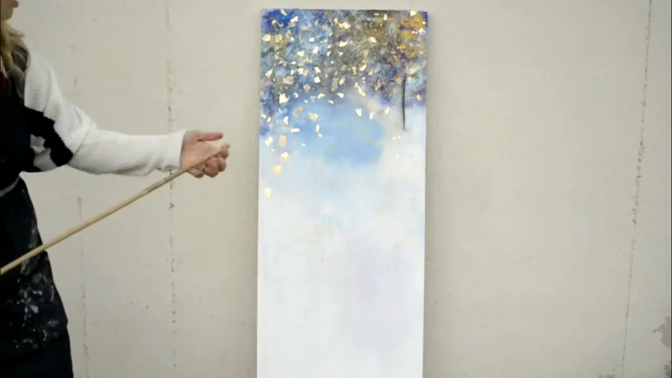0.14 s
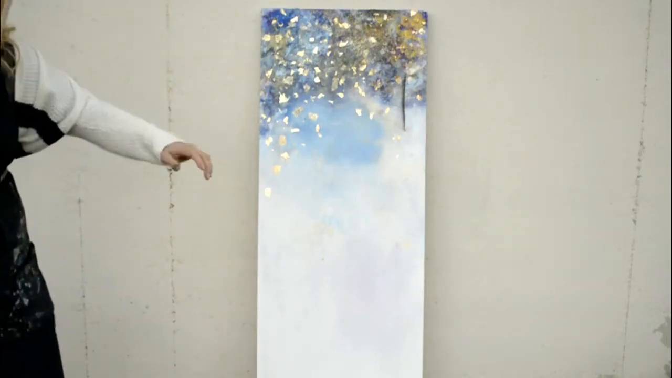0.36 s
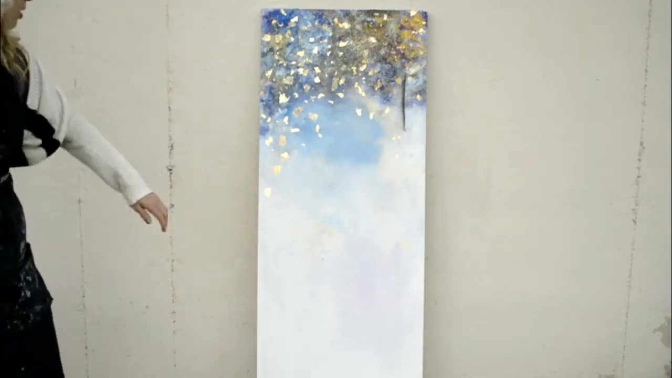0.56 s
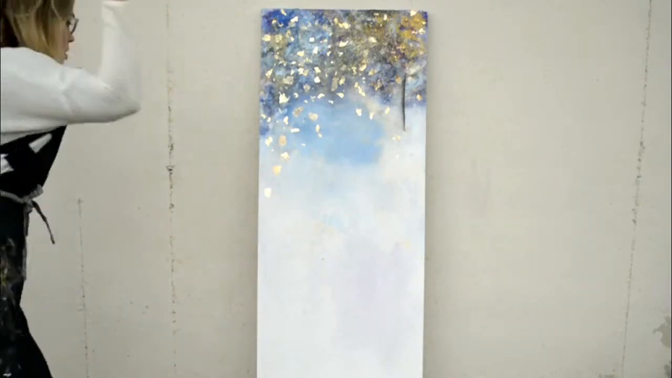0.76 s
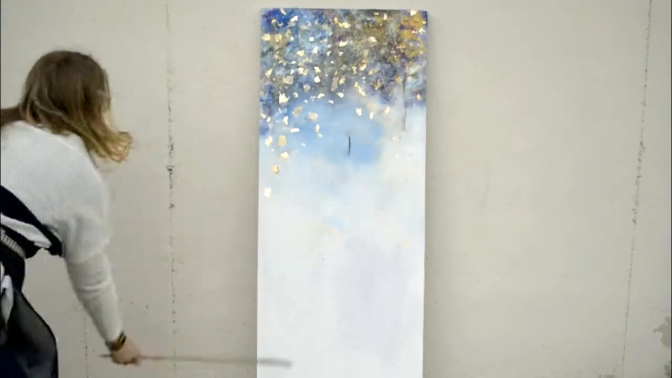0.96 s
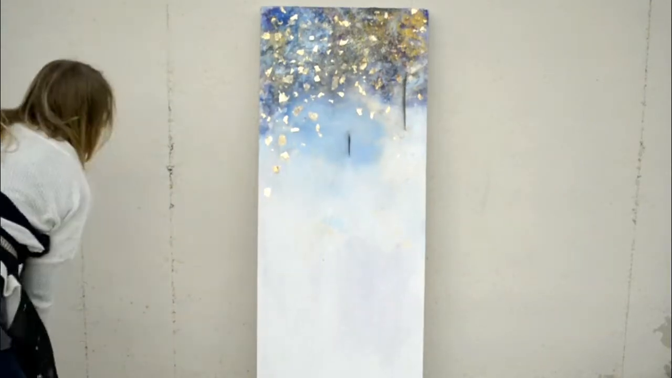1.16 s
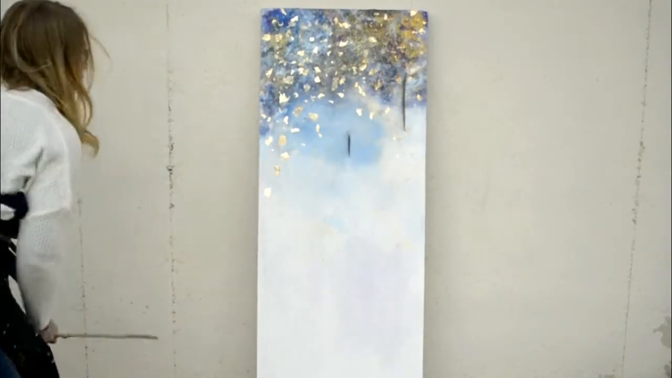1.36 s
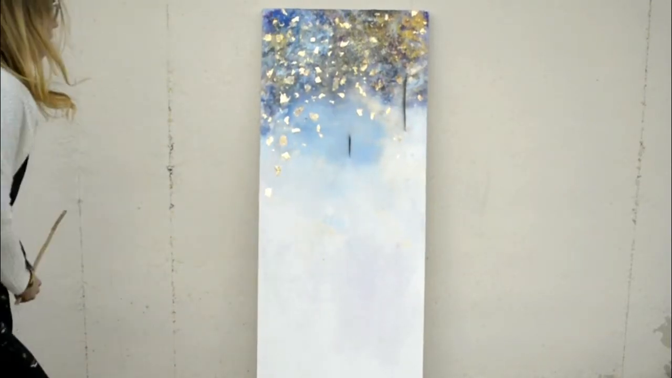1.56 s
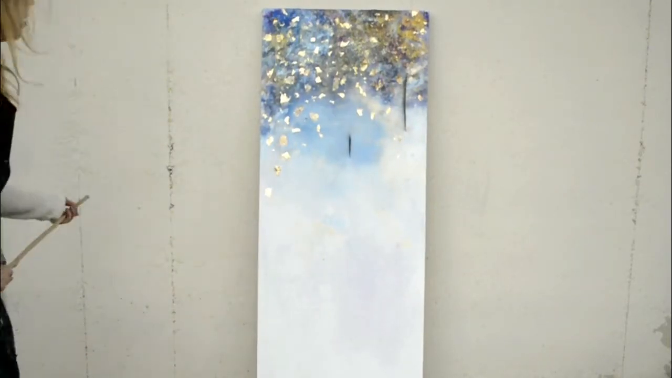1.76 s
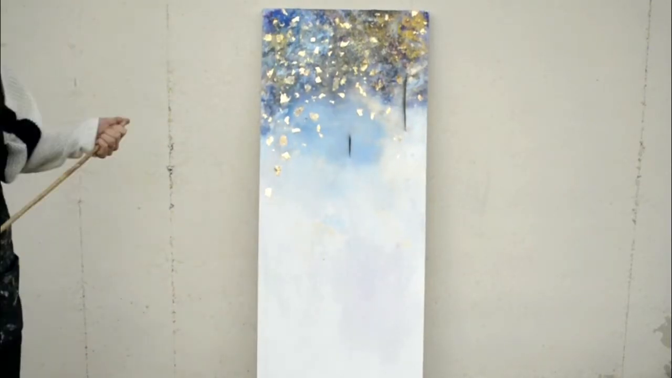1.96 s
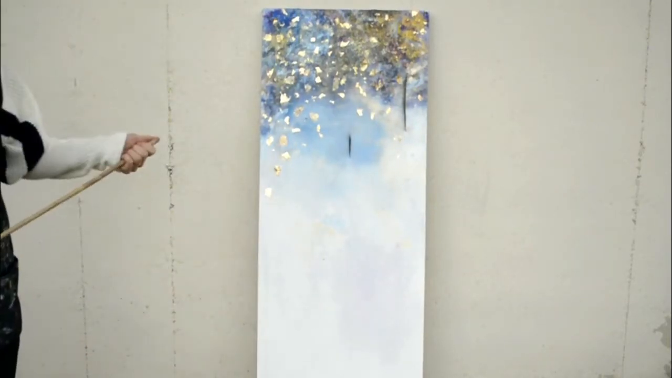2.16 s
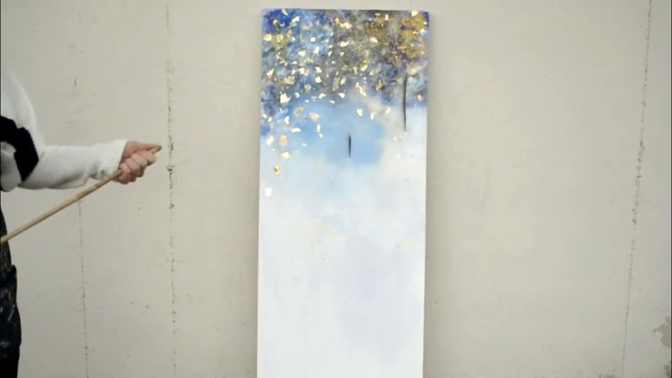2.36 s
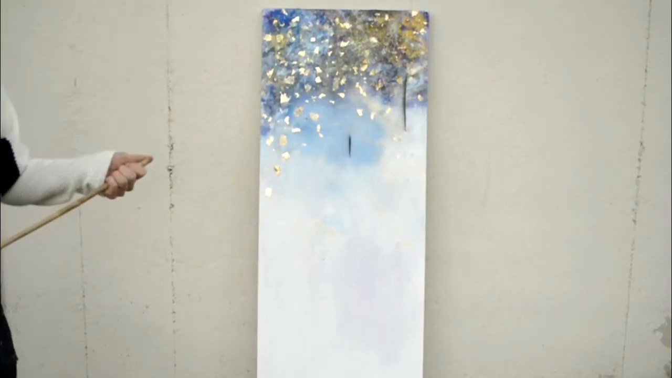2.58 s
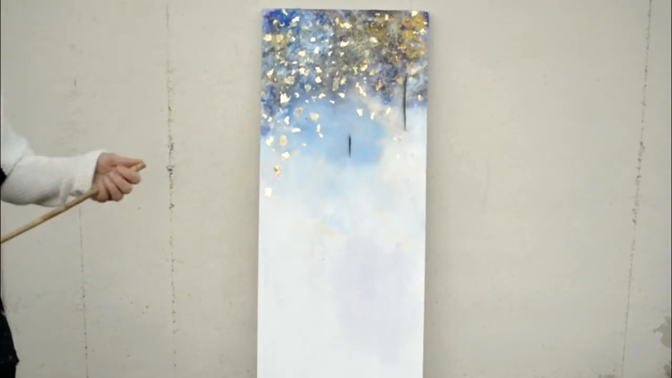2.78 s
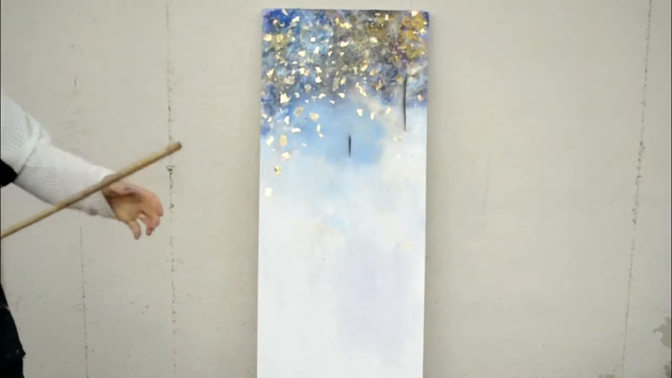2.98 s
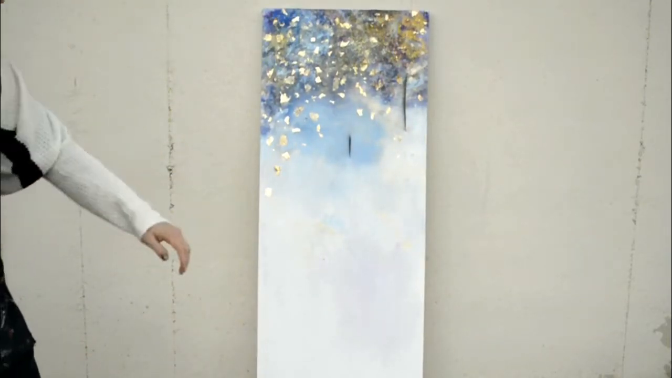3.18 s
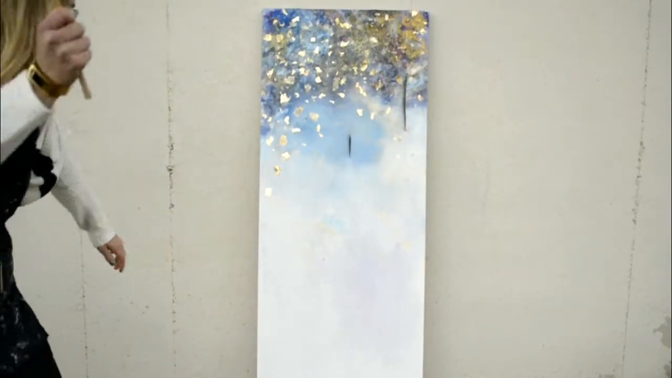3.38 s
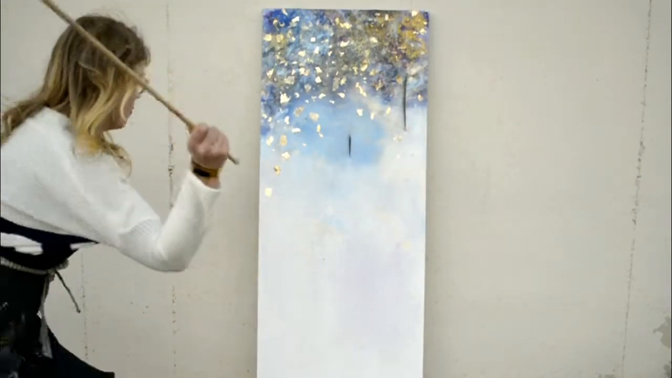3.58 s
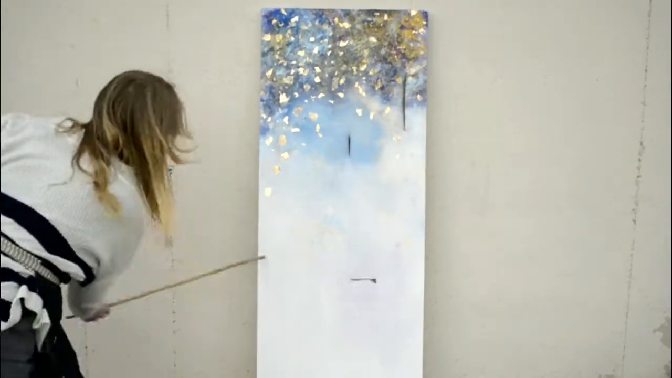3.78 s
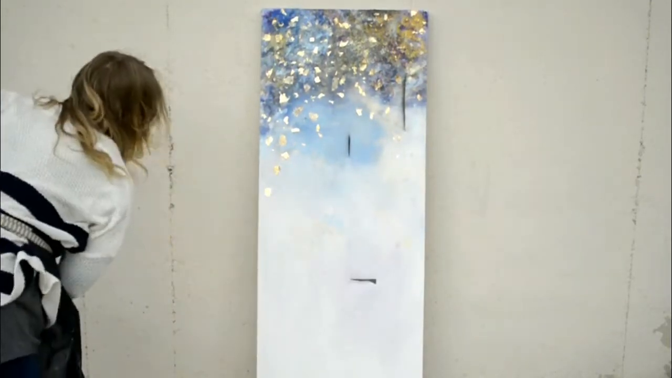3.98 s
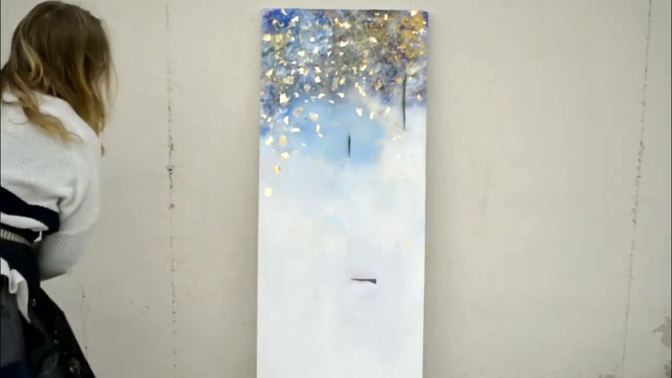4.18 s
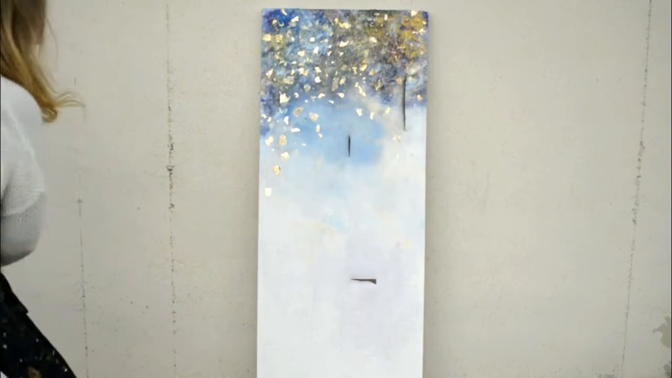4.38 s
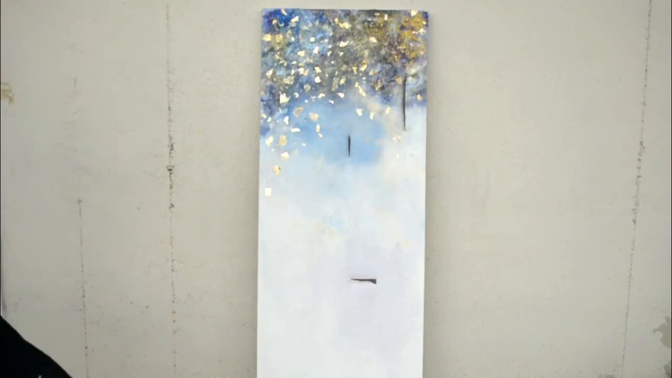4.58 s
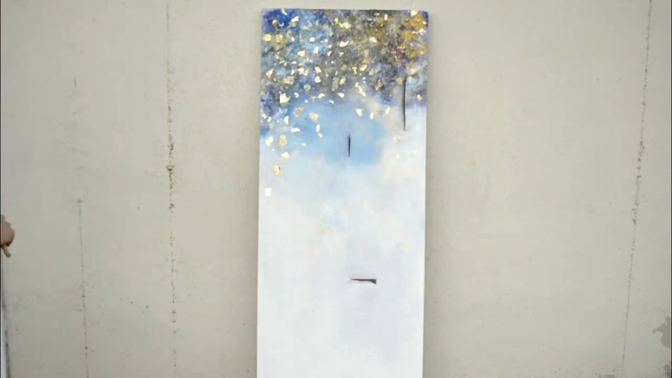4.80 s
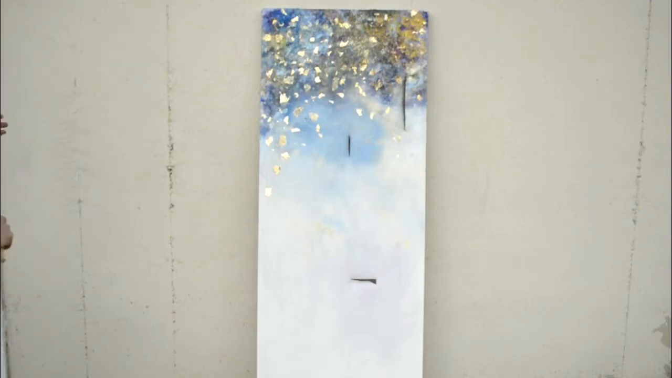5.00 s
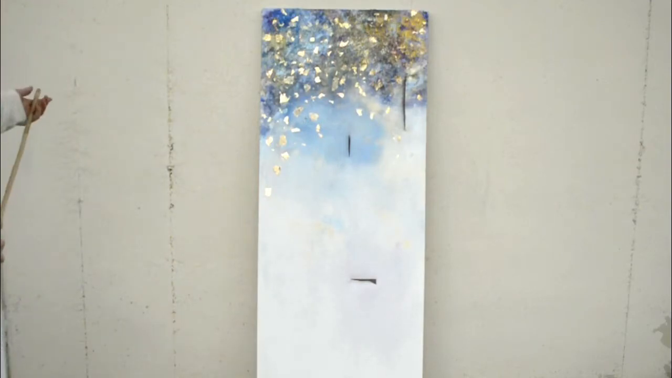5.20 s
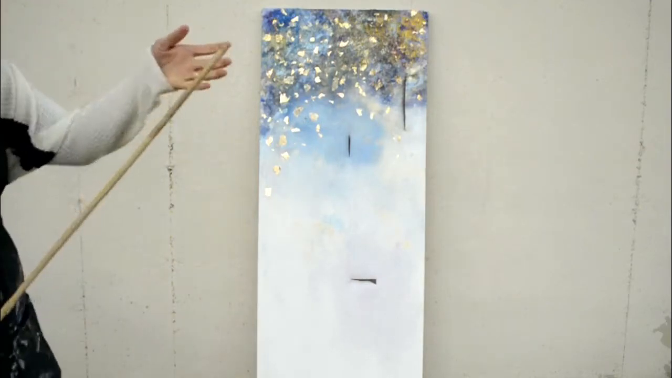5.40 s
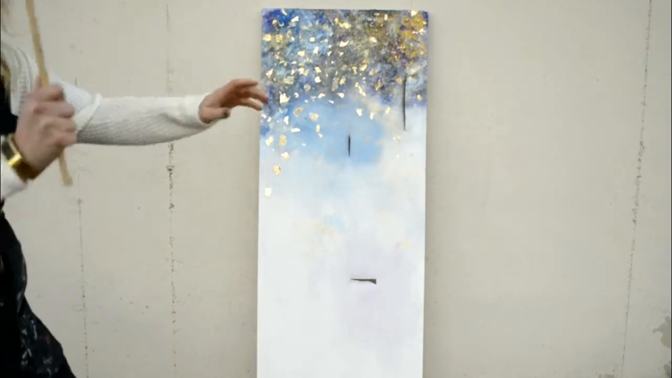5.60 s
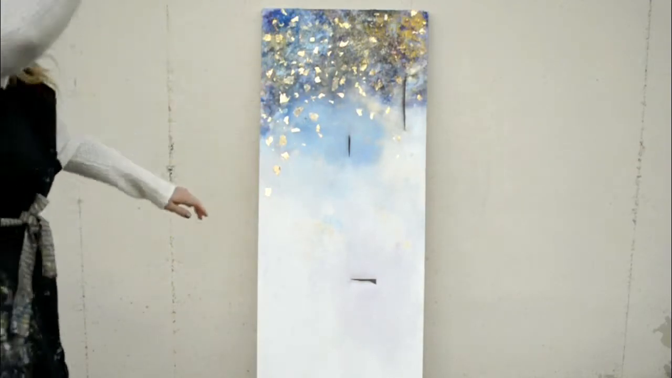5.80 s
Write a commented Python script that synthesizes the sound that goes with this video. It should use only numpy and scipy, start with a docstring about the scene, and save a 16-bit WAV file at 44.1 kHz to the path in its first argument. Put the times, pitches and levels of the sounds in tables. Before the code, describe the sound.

A low motor drone near 93 Hz, wavering slightly, and soft ventilation run throughout, with very faint sleeve rustle. Cloth rubs at 0.75 s; a short rising swish leads into a huge, sharp wooden crack at 0.92 s, with a shrill falling hiss, a booming board ring of a fraction of a second, wall echoes and room tail. Bright clacks cluster at 1.02-1.04 s and return from a far wall. A thin, very quiet tone around 1265 Hz swells, holds until about 1.8 s, then slowly dies. A soft bump falls at 1.41 s, a faint shoe shuffle at 1.9 s, and finger ticks and rubs around 2.0 s, sparser afterward. A second swish and slightly louder crack at 3.73 s rings lower, with a knocking clack at 3.80 s. Light ticks and rubs follow at 4.2-4.6 s, firm woody ticks and a scrape at 4.9 s, a tiny wavering squeak at 5.25 s, and a soft scuff at 5.7 s.

```python
"""Close in front of a painted panel in a studio, over a steady motor hum and soft ventilation.
Sleeves rustle, a long wooden stick swishes in and cracks on the board: shrill hisses, a boom, echoes.
Clacks follow; a thin tone swells, holds and slowly dies, with a soft bump, finger ticks and rubs during it.
The second swish and crack ring the board lower down; fewer clacks, firmer ticks and scrapes follow.
Near the end the hand squeaks faintly and shoes scuff the floor. Decaying modes, noise and tones build it."""
import sys
import numpy as np
from scipy import signal
from scipy.fft import rfft, irfft, next_fast_len
from scipy.io import wavfile
from scipy.ndimage import map_coordinates

SR = 44100
rng = np.random.default_rng(int(sys.argv[2]) if len(sys.argv) > 2 else 0)


def to_wav(sig):
    """Store sig (one row per channel, or 1-D mono) as 16-bit WAV at the path in sys.argv[1].

    Samples outside -1..1 are clipped; the rate is SR.
    """
    pcm = np.clip(np.atleast_2d(sig), -1, 1) * 32767
    pcm = np.round(pcm).astype(np.int16)
    wavfile.write(sys.argv[1], SR, pcm.T)  # frames by channels


N = 257984
TIME = np.arange(N) / SR
AGE = TIME[:SR]  # one second, counted from the start of a short sound

# blows on the panel: t/s, crack/dB, board noise/dB, board modes/dB, swish/dB, room/dB,
# snap/dB relative to the crack
BLOWS = [(0.9171, -4, -17.5, -22.5, -43.5, -35, -14), (3.7328, -0.5, -17, -22.5, -44, -35, -10)]
FIRST_BLOW_S = BLOWS[0][0]
# colour of bright wooden contact: f/Hz, relative level/dB
CLACK_COLOUR = [(300, -28), (1200, -12.5), (2400, -2), (3700, 1), (5500, -1.5), (7500, 2.5), (10000, -11),
                (15500, -37)]
# colour of what the far walls return: f/Hz, level/dB
FAR_WALL_COLOUR = [(300, -32), (1200, -19), (2400, -15), (4200, -24), (6500, -32.5), (12000, -48)]
# colour of brushing cloth: f/Hz, relative level/dB
CLOTH_COLOUR = [(300, -20), (2200, -10), (3100, -1.5), (4400, -5), (8500, -0.5), (12000, -10.5),
                (15500, -16.5)]
# colour of dry wood scraping: f/Hz, relative level/dB
SCRAPE_COLOUR = [(300, -16), (640, 8), (800, 4.5), (3300, 3), (5000, -9), (8200, 2), (12000, -14.5),
                 (16000, -20)]


def amp(db):
    """Gain of a level in dB."""
    return 10 ** (np.asarray(db) / 20)


def unit(x):
    """x at rms 1."""
    return x / np.sqrt(np.mean(x ** 2) + 1e-20)


def along(points, hz):
    """Read (f/Hz, value) points on a log frequency axis."""
    f, v = np.transpose(points)
    return np.interp(np.log(hz + 1), np.log(f), v)


def curves(rows):
    """One value per sample for each column after the time."""
    s, *columns = np.transpose(rows)
    return [np.interp(TIME, s, column) for column in columns]


def wobble(rate):
    """A smooth random curve with this many knots a second."""
    knots = rng.standard_normal(int(N * rate / SR) + 4)
    return map_coordinates(knots, [TIME * rate])


def filtered(x, response):
    """x with its spectrum multiplied by a response of frequency."""
    m = next_fast_len(len(x) + 8192)  # zero padding
    spectrum = rfft(x, m) * response(np.fft.rfftfreq(m, 1 / SR))
    return irfft(spectrum, m)[:len(x)]


def noise(colour, size=N):
    """Coloured noise of rms 1."""
    return unit(filtered(rng.standard_normal(size), lambda hz: amp(along(colour, hz))))


def fade(t, t60):
    """Free decay, 60 dB in t60 seconds."""
    return np.exp(-np.log(1000) * t / t60)


def dying(colour, decay):
    """A second of coloured noise in which each frequency dies at its own speed."""
    hz, t, bins = signal.stft(noise(colour, size=SR), SR, nperseg=256)
    t60 = along(decay, hz)[:, None]
    return signal.istft(bins * fade(t, t60), SR)[1][:SR]


def phase(hz):
    """Running phase of a moving frequency."""
    return 2 * np.pi * np.cumsum(hz) / SR


def whistle(hz, knot_rate):
    """Narrow noise of rms 1 around a moving frequency; more knots a second widen it."""
    turn = phase(hz)
    return unit(wobble(knot_rate) * np.sin(turn) + wobble(knot_rate) * np.cos(turn))


def add(track, s, sound):
    """Mix a sound into the track from time s."""
    part = track[round(s * SR):][:len(sound)]
    part += sound[:len(part)]


def reverberation(colour, build_s=0.021):
    """The studio's answer to one short sound: it swells as the walls are reached, then dies away."""
    # room decay: f/Hz, t60/s
    room_decay = [(150, 0.76), (1500, .62), (4000, 0.47), (8000, 0.38), (14000, 0.16)]
    return dying(colour, room_decay) * (1 - np.exp(-AGE / build_s))


def stroke(s, length):
    """Envelope that rises from nothing and sinks back over one length, as in a sliding movement."""
    progress = np.clip((TIME - s) / length, 0, 1)
    return np.sqrt(np.abs(np.sin(np.pi * progress)))


def blend(cloth, wood, share):
    """Mix of cloth and wood with this share of the power in the wood."""
    share = np.clip(share, 0, 1)
    return np.sqrt(1 - share) * cloth + np.sqrt(share) * wood


def crack(snap_db, contact_s=.0003, recoil_s=0.00028, snap_t60=.008,
          buzz_db=-27, buzz_t60=0.062, grain_db=4, grain_rate=900):
    """The stick slaps flat: a push of air, equal suction as the board springs back, a snap and a buzz."""
    # splintery snap of the stick: f/Hz, relative level/dB
    snap_colour = [(1200, -11), (3200, -0.5), (5800, -5), (8800, 3), (11000, -12), (15500, -22)]
    push = np.clip(1 - (2 * AGE / contact_s - 1) ** 4, 0, None)
    suction = (AGE > contact_s) * np.exp(-AGE / recoil_s)
    balanced_suction = suction * push.sum() / suction.sum()
    crackle = unit(amp(grain_db * wobble(grain_rate)))[:SR]
    snap_shape = amp(snap_db) * fade(AGE, snap_t60)
    buzz_shape = amp(buzz_db) * crackle * fade(AGE, buzz_t60)
    return push - balanced_suction + noise(snap_colour, size=SR) * (snap_shape + buzz_shape)


def blows(spread_s=0.0012, echo_t60=0.038):
    """Each blow cracks and rings the main modes; dense bending waves spread and the room answers."""
    # main modes, struck high up and lower down: f/Hz, level/dB, t60/s
    upper_modes = [(305, -1.5, 0.19), (385, 15.5, 0.025), (433, 0, .17), (668, -6, .12), (756, -4, 0.13),
                   (930, -8, 0.14), (1013, -6, 0.14), (1179, -9, .11), (1308, -8, .12), (1720, -7, 0.11)]
    lower_modes = [(155, -5, 0.049), (187, 8, 0.085), (230, 5, .11), (434.5, -4, 0.1), (538, 6.5, 0.052),
                   (681, -2.5, 0.1), (872, -5, 0.12), (1130, 2, .085), (1225, 3.5, 0.025),
                   (1750, -4.5, 0.093), (2150, -4, .05), (2355, -6.5, 0.09)]
    # dense rest of the ringing at the two places: f/Hz, relative level/dB
    upper_board = [(40, -18), (90, -13), (170, -5.5), (330, -0.5), (500, -2.5), (1050, -5), (1800, -8),
                   (2700, -12), (4300, -15.5), (6000, -21), (9000, -23.5), (15500, -38)]
    lower_board = [(50, -35), (110, -15), (200, -1), (330, -2), (560, -2.5), (800, -5), (1150, -2),
                   (2200, -8.5), (3200, -14.5), (5500, -18.5), (8500, -21.5), (15500, -44.5)]
    # decay of that ringing: f/Hz, t60/s
    board_decay = [(150, 0.15), (600, 0.14), (2000, 0.12), (9000, 0.086)]
    # colour of the room's answer: f/Hz, relative level/dB
    room_colour = [(60, -6.5), (200, 3), (600, -4), (1800, 2), (3500, -8.5), (8000, -12.5), (15000, -30.5)]
    # far walls throw the crack back: delay/s, level/dB relative to the crack setting
    echoes = [(.048, -37), (.092, -42.5), (.118, -43.5), (.153, -46.5)]
    out = np.zeros(N)
    places = ((upper_modes, upper_board), (lower_modes, lower_board))
    for blow, (modes, board_colour) in zip(BLOWS, places):
        s, crack_db, board_db, modes_db, _, room_db, snap_db = blow
        ring = sum(amp(db) * np.cos(2 * np.pi * hz * AGE) * fade(AGE, t60) for hz, db, t60 in modes)
        waves = dying(board_colour, board_decay) * (1 - np.exp(-AGE / spread_s))
        add(out, s, amp(crack_db) * crack(snap_db))
        add(out, s, amp(modes_db) * ring)
        add(out, s, amp(board_db) * waves)
        add(out, s, amp(room_db) * reverberation(room_colour))
        for delay, db in echoes:
            echo = noise(FAR_WALL_COLOUR, size=SR) * fade(AGE, echo_t60)
            add(out, s + delay, amp(crack_db + db) * echo)
    return out


def swishes(top_hz=560, swing_s=0.068, steepness=7, rush_db=-5, rush_steepness=14):
    """The stick sheds vortices: their pitch follows its speed, and a turbulent rush joins as it lands."""
    # turbulence behind the stick: f/Hz, relative level/dB
    rush_colour = [(200, -6), (600, 0), (1400, -2), (2500, -13), (8000, -18), (15000, -34)]
    out = np.zeros(N)
    turbulence = amp(rush_db) * noise(rush_colour)
    for s, _, _, _, swish_db, *_ in BLOWS:
        speed = np.clip(1 - ((TIME - s) / swing_s) ** 2, 0, 1) * (TIME < s)
        vortices = speed ** steepness * whistle(top_hz * speed, knot_rate=280)
        out += amp(swish_db) * (vortices + speed ** rush_steepness * turbulence)
    return out


def shrill_hisses():
    """Brief shrill hisses: the first falls in pitch, the second slightly, the last is a steady wide fizz."""
    # hisses: t/s, length/s, level/dB, first f/Hz, last f/Hz, width as knots/s
    hisses = [(0.9228, .0032, -24, 10900, 8600, 700), (0.923, .009, -35, 8800, 8200, 3500),
              (0.98, .012, -42, 10490, 10520, 8014)]
    out = np.zeros(N)
    for s, length, db, first, last, knot_rate in hisses:
        hz = np.interp(TIME, [s, s + length], [first, last])
        out += amp(db) * stroke(s, length) * whistle(hz, knot_rate)
    return out


def clacks(hit_db=11.5, hit_t60=0.0065, ring_db=-3, hardening=0.36, room_db=-23.5, typical_t60=0.098):
    """Wood clatters: a hard contact, a bright ring over a dull knock, and a far wall's delayed return."""
    # light wooden contacts: t/s, bright clack/dB, dull knock/dB, t60/s
    contacts = [(1.019, -22.5, -50, 0.084), (1.0202, -24, -44, .05), (1.023, -25, -44.5, .11),
                (1.0328, -31, -48, .1), (1.0387, -34.5, -46, .09), (3.797, -30, -24.5, 0.03),
                (3.823, -58, -35, 0.054), (4.0307, -62, -49.5, 0.072)]
    # dull knock: f/Hz, relative level/dB
    knock_colour = [(60, -18.5), (170, -1), (270, -4), (450, 1), (1200, -3), (1800, -11.5), (6000, -33)]
    out = np.zeros(N)
    for s, clack_db, knock_db, t60 in contacts:
        # harder contacts have a sharper edge; longer rings stir the room more
        edge = amp(hit_db + hardening * clack_db) * fade(AGE, hit_t60)
        shape = edge + amp(ring_db) * fade(AGE, t60)
        room = amp(room_db) * t60 / typical_t60
        for colour, db in ((CLACK_COLOUR, clack_db), (knock_colour, knock_db)):
            add(out, s, amp(db) * (noise(colour, size=SR) * shape + room * reverberation(colour)))
    far_return = filtered(out, lambda hz: amp(along(FAR_WALL_COLOUR, hz) - 1))
    add(out, .108, far_return)  # delay in s
    return out


def thin_ring(hz=1265, level_db=-68, rise_s=0.34, hold_s=0.91, t60=0.99):
    """One thin tone swells after the first blow, holds and slowly dies away."""
    age = np.maximum(TIME - FIRST_BLOW_S, 0)
    shape = (1 - np.exp(-age / rise_s)) * fade(np.maximum(age - hold_s, 0), t60)
    return amp(level_db) * shape * np.sqrt(2) * np.sin(2 * np.pi * hz * TIME)


def thud(attack_s=0.0013, knock_db=-5, knock_t60=0.052, room_db=-10.0, room_t60=0.27):
    """A soft bump: a dull knock rings one low mode and stirs the room."""
    # bumps: t/s, level/dB, f/Hz, t60/s
    bumps = [(1.4118, -35, 390, 0.072)]
    out = np.zeros(N)
    for s, db, hz, t60 in bumps:
        dull = [(hz / 4, -12), (hz, 0), (2 * hz, -8), (3 * hz, -20), (8 * hz, -50)]  # f/Hz, level/dB
        mode = np.sin(2 * np.pi * hz * AGE) * fade(AGE, t60)
        knock = amp(knock_db) * noise(dull, size=SR) * fade(AGE, knock_t60)
        room = amp(room_db) * reverberation(dull) * fade(AGE, room_t60)
        onset = (1 - np.exp(-AGE / attack_s)) ** 2
        add(out, s, amp(db) * onset * (mode + knock + room))
    return out


def ticks(firm_t60=0.0053, soft_t60=0.022, tick_db=-9.0, after_db=-27, after_t60=0.19,
          faint_db=-62, scatter_db=3.0, count=12):
    """The stick ticks on the fingers, shorter and woodier when firmer; faint ones fall at random."""
    # clearest ticks, before tick_db and after_db: t/s, level/dB
    clear = [(1.491, -51), (1.9663, -44), (1.983, -40.5), (1.9913, -37), (1.9969, -45), (2.0123, -47),
             (2.029, -48.5), (2.346, -54), (2.4364, -50), (4.24, -46), (4.2902, -41.5), (4.296, -52),
             (4.379, -54), (4.437, -51.5), (4.909, -33), (4.928, -34), (4.9345, -32)]
    # a soft tick is all skin and cloth; one firmer by this range is all wood
    soft_tick_db, firm_range_db = -50.5, 25.5
    out = np.zeros(N)
    draws = rng.uniform([FIRST_BLOW_S, -1], [TIME[-1], 1], (count, 2))
    faint = [(s, faint_db + scatter_db * z) for s, z in draws]
    for s, db in clear + faint:
        firmness = np.clip((db - soft_tick_db) / firm_range_db, 0, 1)
        touch = blend(noise(CLOTH_COLOUR, size=SR), noise(SCRAPE_COLOUR, size=SR), firmness)
        t60 = soft_t60 + firmness * (firm_t60 - soft_t60)
        shape = amp(tick_db) * fade(AGE, t60) + amp(after_db) * fade(AGE, after_t60)
        add(out, s, amp(db) * touch * shape)
    return out


def rubs(grain_db=3, slip_rate=700, catch_db=3, catch_rate=110):
    """Cloth rubs and the stick slides through the palm in fine slips, catching unevenly."""
    # strokes of cloth and palm: t/s, length/s, level/dB, share of dry wood scrape (0-1)
    strokes = [(0.749, 0.14, -67, 0.15), (1.285, 0.063, -70.5, 0), (1.744, 0.048, -68.5, 0.03),
               (1.972, 0.056, -57, 0.06), (1.992, .012, -51.5, 0), (2.766, 0.035, -65, 0.04),
               (3.505, .17, -65, 0.07), (4.051, 0.055, -65.5, 0.8), (4.234, 0.076, -68.5, 0.5),
               (4.578, .1, -61.5, 0.33), (4.8817, 0.041, -46.5, 0.69), (4.915, 0.037, -57.5, 0.86),
               (5.37, 0.18, -72, 0.1)]

    def rough(colour):
        """Noise with fine slips and slower catches in its level."""
        uneven_db = grain_db * wobble(slip_rate) + catch_db * wobble(catch_rate)
        return unit(noise(colour) * amp(uneven_db))

    cloth, wood = rough(CLOTH_COLOUR), rough(SCRAPE_COLOUR)
    return sum(amp(db) * stroke(s, length) * blend(cloth, wood, share) for s, length, db, share in strokes)


def squeak(octave_db=-9, room_db=-14):
    """A faint squeak wavers in pitch, with a weak octave, and scatters in the room."""
    # pitch and level: t/s, f/Hz, level/dB
    glide = [(5.215, 3300, -83), (5.237, 3900, -70), (5.249, 4060, -68), (5.259, 3800, -68),
             (5.268, 3173, -65), (5.28, 3300, -70), (5.287, 3500, -82)]
    hz, db = curves(glide)
    sounding = (TIME > glide[0][0]) & (TIME < glide[-1][0])
    octave = amp(octave_db) * whistle(2 * hz, knot_rate=600)
    direct = sounding * amp(db) * (whistle(hz, knot_rate=480) + octave)
    tail = reverberation(CLACK_COLOUR)
    room = signal.fftconvolve(direct, tail / np.linalg.norm(tail))[:N]
    return direct + amp(room_db) * room


def scuffs(grain_db=3):
    """Shoes shift on the floor: soles shuffle softly and unevenly."""
    # scuffs: t/s, length/s, level/dB
    shuffles = [(1.882, 0.15, -68.5), (5.678, 0.13, -64)]
    # shuffling sole: f/Hz, relative level/dB
    sole_colour = [(200, -10), (450, 1), (900, 0.5), (1800, -12), (5000, -29)]
    sole = unit(noise(sole_colour) * amp(grain_db * wobble(60)))
    return sole * sum(amp(db) * stroke(s, length) for s, length, db in shuffles)


def sleeves(still_db=-83, swing_db=-80, lag_s=0.14, half_width_s=0.81, flutter_db=1.68):
    """Sleeves brush all the time, and more as the arm winds up and follows through."""
    swings = sum(np.exp(-((TIME - s - lag_s) / half_width_s) ** 2) for s, *_ in BLOWS)
    level = amp(still_db) + amp(swing_db) * swings
    return level * amp(flutter_db * wobble(18)) * noise(CLOTH_COLOUR)


def hum(waver_hz=0.037, flutter_db=0.43, fading_rate=2):
    """A motor drones on multiples of its wandering shaft speed; each overtone fades in and out alone."""
    # motor: t/s, shaft speed/(turns/s), level/dB
    motor = [(0, 23.4, -58.5), (.3, 23.95, -61), (1.3, 23.25, -63.5), (2.5, 23.3, -57.5),
             (2.8, 23.5, -57.5), (3.4, 23.6, -58.5), (4.3, 22.9, -58.5), (4.7, 22.8, -59),
             (5.85, 23.2, -60)]
    # overtones: multiple of shaft speed, level/dB relative to the motor, depth of slow fading/dB
    orders = [(4, 0.5, 0.38), (5, -13, 1.5), (6, -19.5, 0.5), (8, -5, 0.2), (12, -8, 0.56), (16, -19, 2),
              (20, -23, 2)]
    # single overtones sink for a while: multiple, t/s, half width/s, level change/dB
    dips = [(8, 0.06, 0.32, -19), (8, 2.5, 0.31, -4.5), (12, 0, 0.18, -8.5), (12, 1.53, 0.55, -10.5),
            (12, 2.5, 0.54, -12.5), (12, 6, 0.36, -13)]
    speed, level_db = curves(motor)
    turn = phase(speed + waver_hz * wobble(7))
    out = np.zeros(N)
    for k, db, fading_db in orders:
        dip_db = sum(depth * np.exp(-((TIME - s) / width) ** 2)
                     for which, s, width, depth in dips if round(which) == round(k))
        drift_db = fading_db * wobble(fading_rate) + flutter_db * wobble(5.8)
        gain = amp(level_db + db + dip_db + drift_db)
        out += gain * np.sqrt(2) * np.sin(round(k) * turn + rng.uniform(0, 2 * np.pi))
    return out


def air(level_db=-66.5):
    """The soft steady rush of ventilation, as coloured noise."""
    # rush of the room: f/Hz, relative level/dB
    air_colour = [(25, -4.5), (60, 1), (130, 2), (250, -4), (500, -5.5), (1000, -6), (2000, -12.5),
                  (4000, -25), (8000, -31), (15500, -40.5)]
    return amp(level_db) * noise(air_colour)


def scene():
    """Everything as heard from one spot in front of the panel."""
    panel = blows() + swishes() + shrill_hisses() + clacks() + thin_ring() + thud()
    handling = ticks() + rubs() + squeak() + scuffs() + sleeves()
    return (panel + handling + hum() + air())[None]


def record(dry, bass_hz=64, treble_hz=13500, top_hz=16200):
    """The recorder clips at full scale, loses deep bass and high treble and has a steep band limit."""
    band = signal.butter(2, [bass_hz, min(treble_hz, SR * .45)], "band", fs=SR, output="sos")
    heard = signal.sosfilt(band, np.clip(dry, -1, 1))
    return np.array([filtered(x, lambda hz: 1 / (1 + (hz / top_hz) ** 120)) for x in heard])


dry = scene()
out = record(dry)
to_wav(out)
```